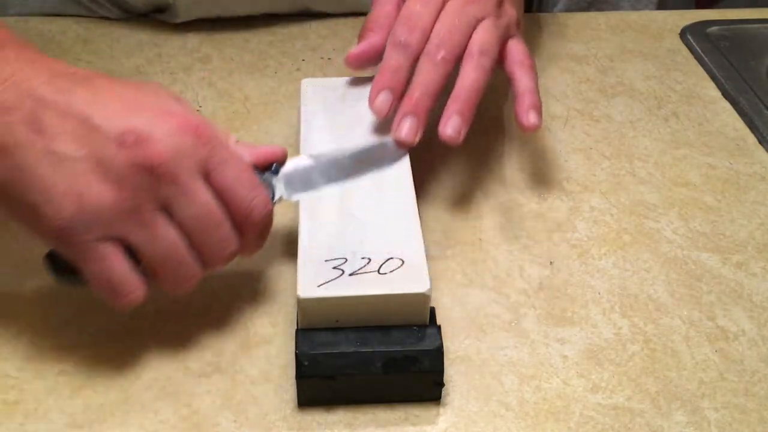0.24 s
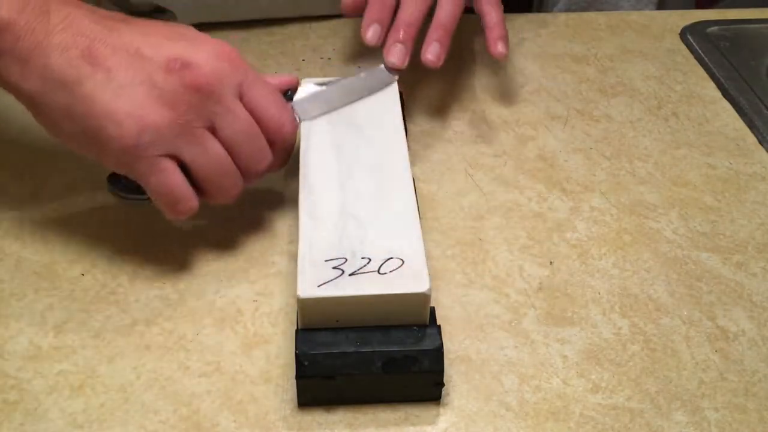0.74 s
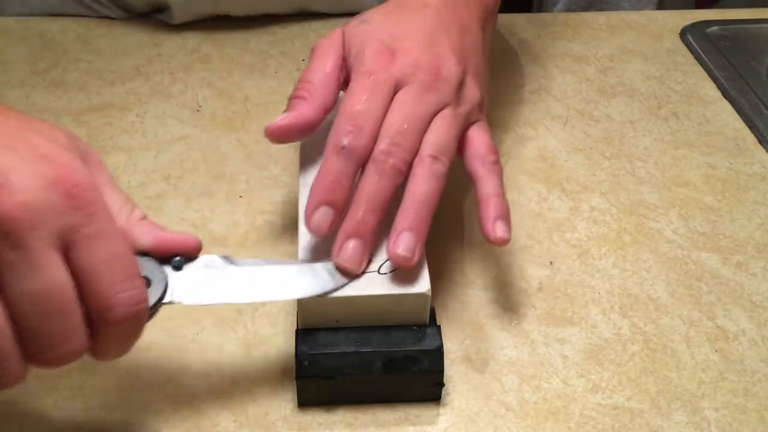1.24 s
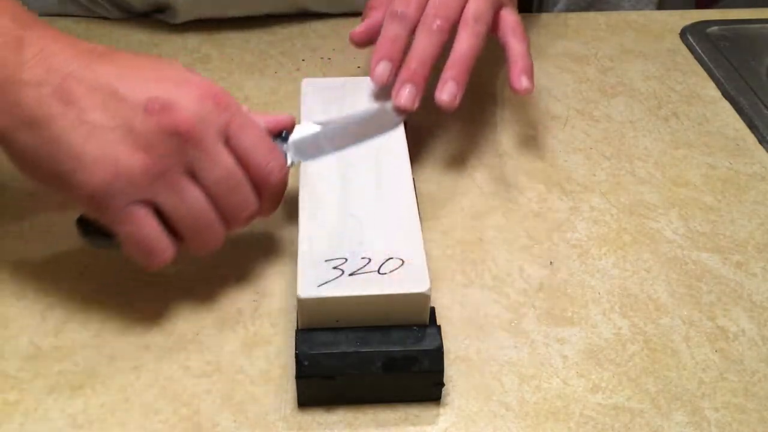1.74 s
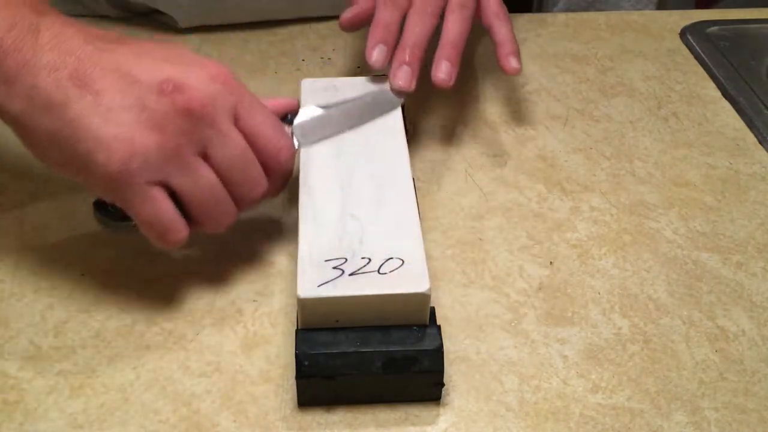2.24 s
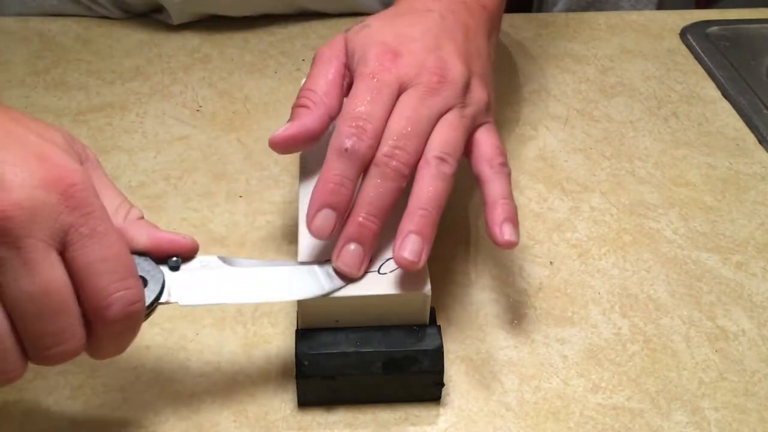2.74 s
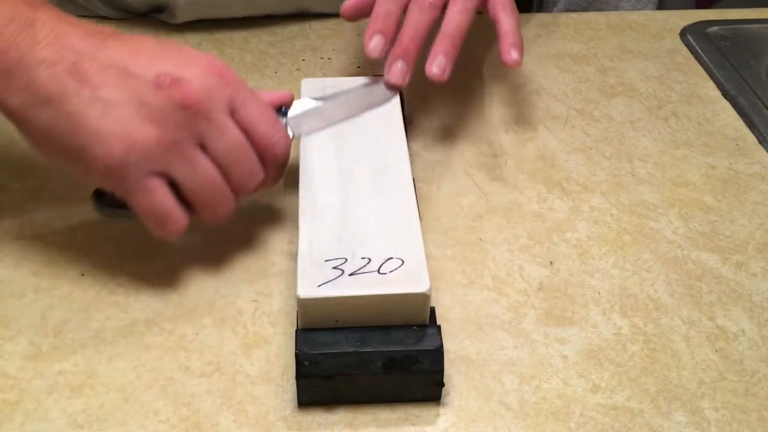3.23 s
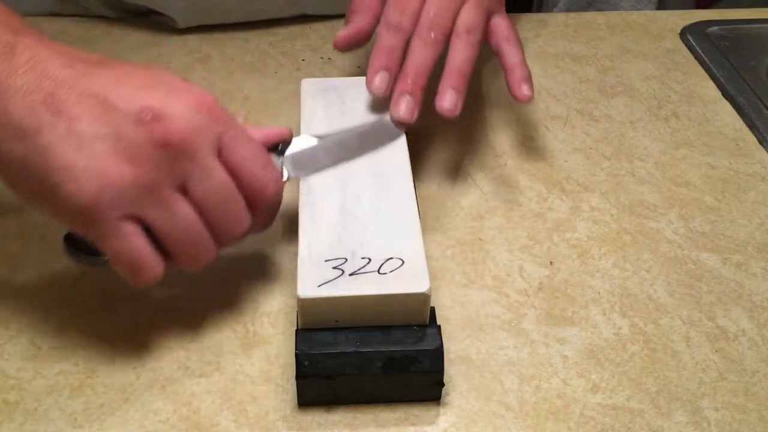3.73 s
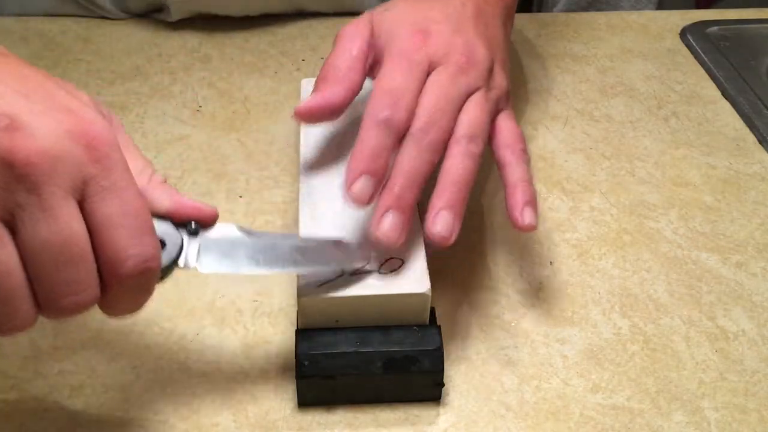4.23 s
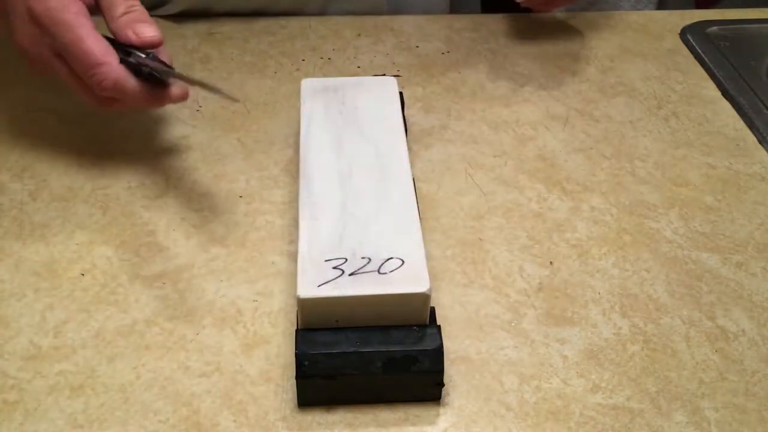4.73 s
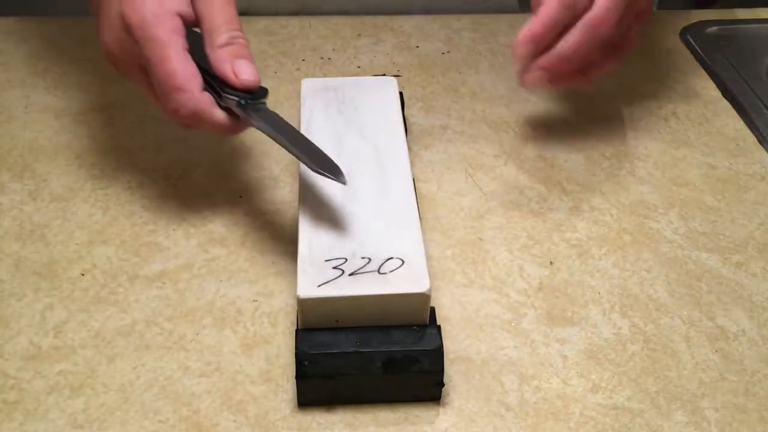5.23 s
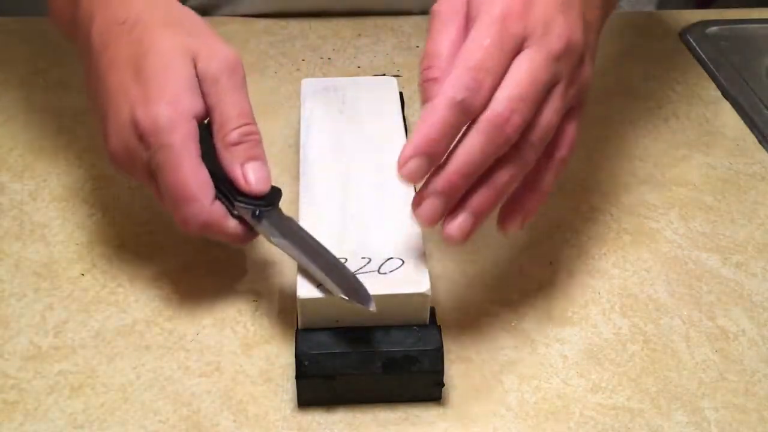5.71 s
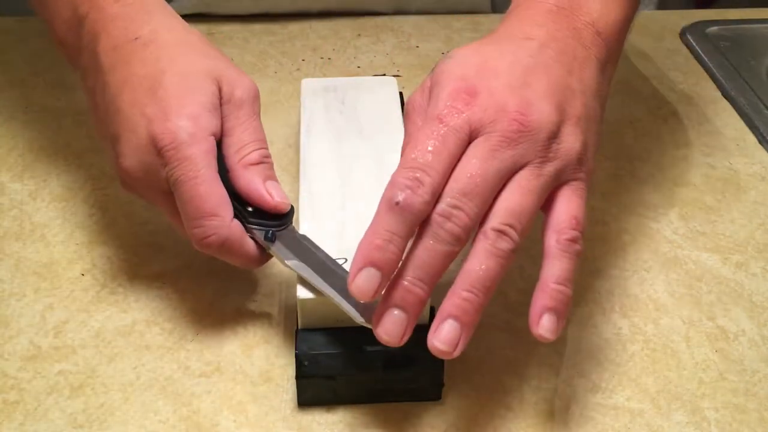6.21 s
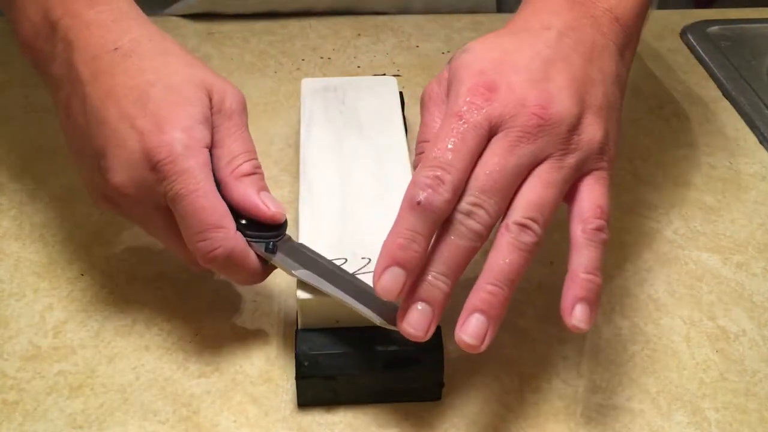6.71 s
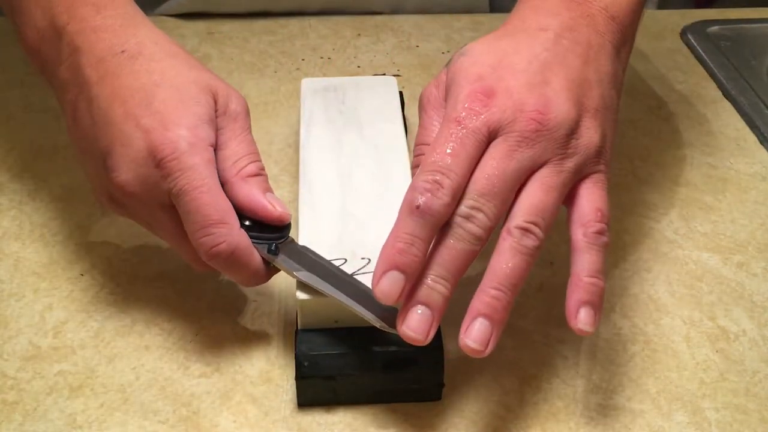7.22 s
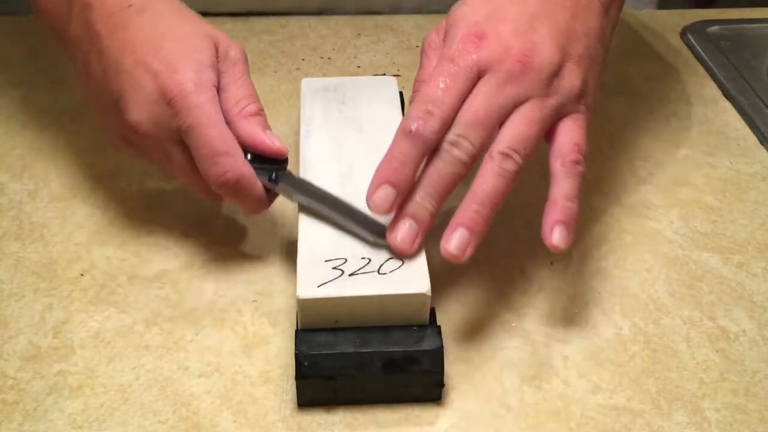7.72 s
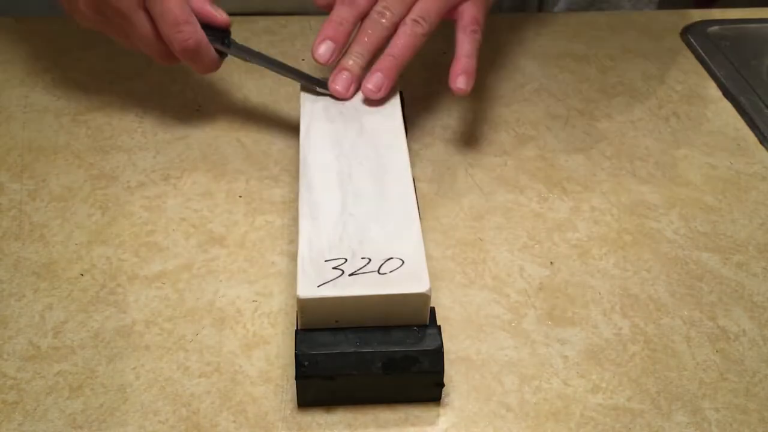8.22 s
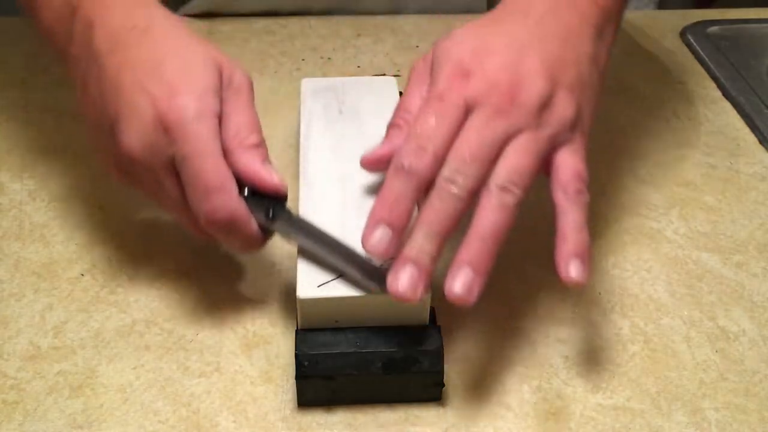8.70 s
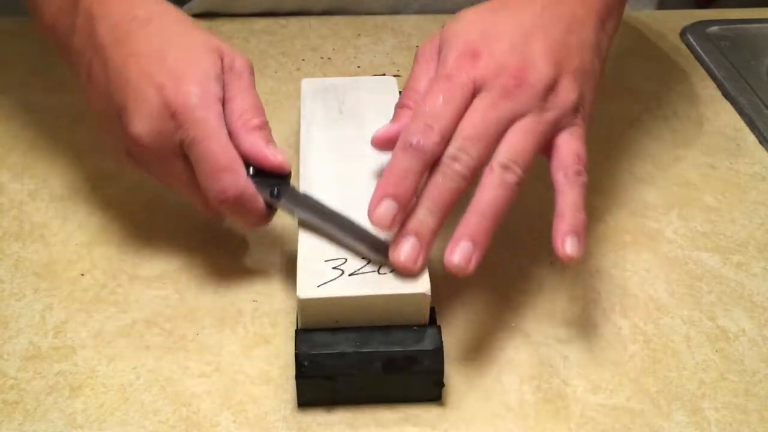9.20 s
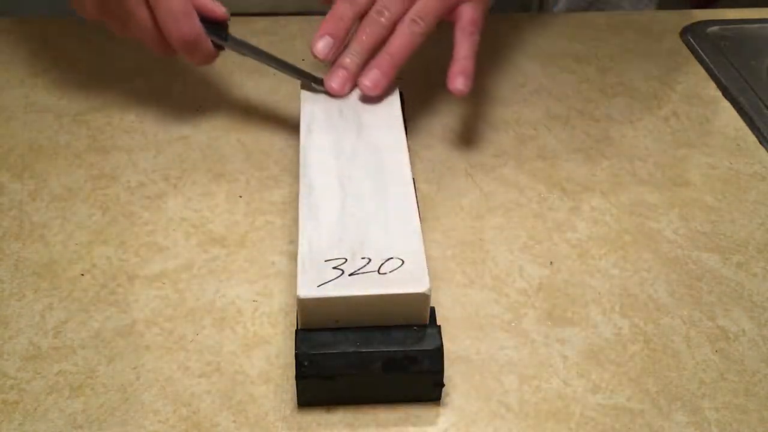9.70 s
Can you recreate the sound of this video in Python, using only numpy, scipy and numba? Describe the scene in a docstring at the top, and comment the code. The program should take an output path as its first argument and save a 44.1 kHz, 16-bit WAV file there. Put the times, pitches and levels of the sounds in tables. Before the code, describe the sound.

Close up in a kitchen, a knife blade strokes a wet sharpening stone in even, hissing, ringing rasps, alternating push and pull. After six strokes it stops; soft grip rustles and tiny scrapes follow as the tip is placed. Then four brisker strokes begin, the last cut short. A low appliance hum and dull counter rumble lie underneath.

```python
"""Knife on a wet whetstone, kitchen counter

Close mono perspective, one microphone position, a short tail from nearby walls: six strokes along a folding
knife's edge, a pause in which the tip is set down and nudged, then four on the tip, the last cut short.
Gritty noise rasps and excites resonances whose pitch and strength follow the contact; catches click on top.
The counter rumbles as filtered noise; behind it lie air noise, faint room tones and an appliance's hum.
"""
import sys
import numpy as np
from scipy import signal
from scipy.fft import rfft, irfft, next_fast_len
from scipy.io import wavfile
from scipy.ndimage import map_coordinates
from numba import njit

SR = 44100
rng = np.random.default_rng(int(sys.argv[2]) if len(sys.argv) > 2 else 0)


def digitize_waveform(pressure):
    """Quantize a signal to 16-bit integers and store it at the path in sys.argv[1].

    Rows of a 2-D input are taken as channels; values are limited to [-1, 1].
    """
    field = np.atleast_2d(pressure).T
    bounded = np.clip(field, -1, 1)
    quanta = np.round(bounded * 32767).astype(np.int16)
    wavfile.write(sys.argv[1], SR, quanta)


N = 438794
TIME = np.arange(N) / SR
CUTOFF_HZ = 15720  # top of the noise spectra and of the whole pickup

# Widths in these tables are for one pass of a resonance; most noise bands take two passes.
# Room air, spectrum shape: (frequency [Hz], relative density [dB per Hz])
AIR_SPECTRUM = [(20, -18), (36, -9), (52, 7.5), (85, -1), (160, -1.5), (190, -8.5), (370, -9.5),
                (500, -20.5), (1100, -24), (1600, -28), (2200, -29.5), (4500, -39), (10000, -44.5),
                (16000, -48.5)]
AIR_DB = -47.5
# Low room resonance and faint whines: (frequency [Hz], width [Hz], level [dB])
ROOM_TONES = [(57.6, 20.5, -54.5), (1209, 43, -77), (1829, 40, -78.5), (1877, 25, -81.5), (2665, 23, -86.5),
              (2755, 41, -83), (3490, 170, -81)]
# Partials of the appliance: (frequency [Hz], pitch wander [Hz], relative level [dB])
HUM_PARTIALS = [(106.9, 2.51, 1.5), (214.1, 2.98, -17.5), (256.3, 5.4, -17.5), (297, 7, -13.5),
                (357.5, 9, -19)]
# Chance unevenness of the hum's level, before the trim: (time [s], level [dB])
HUM_UNEVENNESS = [(0.0, -50.5), (0.83, -46.5), (0.99, -50.5), (1.13, -48), (3.85, -49), (5.76, -51),
                  (5.85, -63), (6.1, -44), (6.43, -52), (6.79, -43), (7.06, -53), (7.34, -46.5),
                  (8.09, -50.5), (8.76, -45), (9.7, -50), (9.95, -50.5)]
HUM_TRIM_DB = -1.4

# Counter under the stone: (frequency [Hz], width [Hz], relative level [dB])
COUNTER_MODES = [(70, 47, -1), (125, 36, 3), (154, 28, -0.5)]
# The hands resting on the counter, and a trim over resting and stroking rumble alike
RESTING_RUMBLE_DB, RUMBLE_TRIM_DB = -56, -1.5

# Soft rustles as the grip changes: (start [s], length [s], level [dB], centre [Hz], width [Hz])
RUSTLES = [(4.5, 0.25, -73, 1200, 900), (4.618, 0.033, -61, 1500, 500), (4.803, 0.14, -70.5, 1090, 600),
           (5.0, .08, -74, 2100, 800)]
# Wet film squeaking under the resting tip: (start [s], length [s], level [dB], pitch [Hz], rise [Hz/s])
SQUEAK = (7.11, .13, -81, 9780, 3300)

# Coarsest grains catching, steel tapping stone: (time [s], peak before trim [dB], band centre [Hz])
CATCHES = [(0.439, -38, 8650), (0.4774, -40, 3700), (0.9132, -35, 3910), (1.0998, -34, 6430),
           (1.2033, -36.5, 6000), (1.6964, -38, 3840), (1.7786, -37, 3810), (1.9511, -34, 3760),
           (5.8148, -41, 3540), (6.438, -38.5, 9000), (6.6258, -48, 3860), (6.7153, -42.5, 4100),
           (7.065, -49, 9040), (7.0967, -51, 3990), (7.4755, -47.5, 3560), (7.777, -40, 4030),
           (7.857, -37, 6400), (7.934, -31.5, 6020), (8.6218, -37, 8750), (8.6502, -36, 4720),
           (9.3312, -31, 7390), (9.397, -33, 8090), (9.4141, -32, 6830), (9.4332, -31, 6020)]
CATCH_TRIM_DB = -1.5
CRACK_HZ, CRACK_WIDTH_HZ = 7960, 4900  # the broad crack of a catching grain

# Light rubs while the knife is turned over and its tip placed:
# (start [s], length [s], rasp at the middle [dB], swell over the rub [dB], relative ring [dB])
RUBS = [(5.037, .03, -66, 0, -8), (5.293, 0.057, -66.5, -5, -8), (5.816, 0.222, -66.5, -4, -1),
        (6.042, 0.1, -63.5, -3, -1), (6.23, .13, -73, 9, 0), (6.364, 0.14, -62.5, -1, 4),
        (6.682, 0.042, -62.5, -2, -1), (6.87, .025, -70, 0, -1), (6.954, .15, -78, 4, -3)]
RUB_EDGE_S = 0.0069
# Strokes along the edge, push and pull in turn: (start [s], length [s], rasp at mid-stroke [dB],
# rise [s], sag over the stroke [dB], relative ring [dB], rumble before trim [dB])
EDGE_STROKES = [(0.0, 0.68, -56, 0.12, -4, -3, -49), (.71, .72, -55.5, 0.16, 0.5, 0, -49.5),
                (1.43, .7, -57.5, 0.15, 3, 1, -49.5), (2.13, 0.68, -55.5, 0.23, 4.5, 1.5, -46),
                (2.82, .7, -57.5, 0.14, 5.5, -1, -45.5), (3.52, 0.75, -56, .2, 3.5, -1, -43)]
# Strokes on the tip, same columns
TIP_STROKES = [(7.51, .78, -56, 0.074, 4, 2.5, -46.5), (8.29, .735, -59.5, .08, 4.5, 1, -48),
               (9.025, .725, -55.5, 0.11, -6.5, -2.5, -45.5), (9.75, 0.8, -52.5, 0.068, -12.5, -1, -46)]
# Leaving and reaching a turn: (rise exponent [1], braking time [s], fall exponent [1])
EDGE_TURN = (1.18, 0.13, 0.95)
TIP_TURN = (.95, .1, 0.81)

UNSTEADY_DB, UNSTEADY_HZ = 0.88, 21  # the hand's pressure wavers
# Steel biting deeper (+) or riding light (-): (start [s], length [s], change [dB])
BITES = [(0.376, 0.039, -7), (0.42, .06, 0), (0.498, 0.072, -8), (1.708, 0.044, -4.5), (1.765, 0.029, 2),
         (1.814, 0.023, -4), (2.294, 0.037, 2), (3.135, 0.024, -6.5), (8.544, 0.11, 6), (8.89, 0.081, 4),
         (9.326, 0.13, 3)]
BITE_EDGE_S = 0.005

# Broad colour of steel on grit: (frequency [Hz], relative density [dB per Hz])
EDGE_COLOUR = [(700, -14), (2000, -12.5), (2800, -8.5), (3600, -4), (4300, -3), (4850, -6), (5800, 3.5),
               (7500, 0.5), (9400, 1), (10400, -4.5), (11200, 1), (13000, -2), (15800, -3)]
TIP_COLOUR = [(700, -6), (2000, -5.5), (2900, -5), (3900, -0.5), (5100, -7.5), (6200, 2.5), (7800, 1),
              (9400, 3), (10400, -7), (11600, -0.5), (13000, 1), (15800, -2)]
# Share by which the weak modes rise from the near end to the far end; negative falls
EDGE_HISS_BEND, TIP_HISS_BEND = -0.05, 0.09
# Blade modes on the edge, strongest at a spot in the cycle (push 0-1, pull 1-2): (frequency [Hz],
# width [Hz], relative level [dB], spot [strokes], reach [strokes], glide [Hz/stroke])
EDGE_MODES = [(3830, 350, 0.5, 0.59, 0.18, -600), (3860, 450, -2.5, 1.225, 0.093, 0),
              (4350, 550, -5, 1.464, .13, 0), (6020, 540, 6, 0.33, 0.058, 4000),
              (5530, 300, -6.5, 0.59, 0.26, -200), (6200, 1400, -3.5, 1.46, 0.11, 500),
              (6900, 370, -7, 1.68, 0.17, 2000), (6700, 480, -3, 0.075, .1, 1500),
              (8770, 400, -4, 0.27, .12, 4200), (8500, 620, -7, 0.32, 0.68, 2),
              (9030, 480, -7, 1.12, 0.24, 0), (9600, 670, -6.5, 1.63, 0.041, -2000),
              (11760, 1500, -4.5, 0.14, 0.071, 6009), (11660, 780, -12.5, 1.95, 0.069, 0)]
# Blade modes on the tip, same columns
TIP_MODES = [(3970, 360, -2.5, 0.26, 0.36, 200), (4460, 250, -12, 0.71, 0.12, 2500),
             (4560, 360, -8.5, 1.2, 0.23, -1400), (7000, 420, -4, 0.23, 0.12, 1196),
             (6230, 600, -1, 0.52, .1, -800), (6400, 505, -6, 0.83, 0.092, -500),
             (6400, 690, 2.5, 1.277, 0.065, -600), (7200, 500, -5.5, 1.75, 0.13, 0),
             (8750, 610, -1.5, 0.35, 0.14, 296), (9320, 860, 4, 0.75, 0.037, 0),
             (8960, 560, -2, 1.11, 0.19, 600), (8510, 550, -3, 1.8, 0.16, -400),
             (13000, 600, -10, 0.74, .12, 0), (13400, 500, -6, 1.16, 0.082, 4000)]
# A heavier touch brings out low modes: dB of ring per dB of rasp above firm, for a mode at this pitch
HEAVY_RING, FIRM_DB, LOW_MODE_HZ = 0.56, -56, 4000


def from_db(db):
    """Decibels to gain."""
    return 10 ** (np.asarray(db) / 20)


def rms_one(x):
    """Scale to an rms of 1."""
    return x / np.sqrt(np.mean(x ** 2) + 1e-20)


def level(rows):
    """Gain of a (time, dB) curve."""
    return from_db(np.interp(TIME, *np.transpose(rows)))


def held(start, length, edge_s):
    """1 while something lasts, with soft edges."""
    inside_s = np.minimum(TIME - start, start + length - TIME)
    return np.clip(0.5 + inside_s / (2 * edge_s), 0, 1)


def drift(rate_hz, size=N):
    """Smooth chance with spread 1 that changes about rate_hz times a second."""
    hop = 40  # computed at every 40th sample, then joined by straight lines
    settle = 2000
    r = np.exp(-2 * np.pi * rate_hz * hop / SR)
    steps = rng.standard_normal(size // hop + settle + 2)
    slow = signal.lfilter([1], [1, -2 * r, r * r], steps)[settle:]
    return np.interp(np.arange(size) / hop, np.arange(len(slow)), rms_one(slow))


def fading(clicks, fade_s):
    """Each click jumps up and dies away exponentially."""
    return signal.lfilter([1], [1, -np.exp(-1 / (fade_s * SR))], clicks + 1e-18)


def coloured(x, spectrum):
    """Filter by a (Hz, dB) spectrum; white noise keeps its power."""
    hz, db = np.transpose(spectrum)
    size = next_fast_len(N + SR // 10)
    bins = np.maximum(np.fft.rfftfreq(size, 1 / SR), 1)
    gain = from_db(np.interp(np.log(bins), np.log(hz), db)) * (bins < CUTOFF_HZ)
    return irfft(rfft(x, size) * rms_one(gain), size)[:N]


def resonance(x, hz, width_hz):
    """One pass through a fixed resonance with a peak gain of 1."""
    b, a = signal.iirpeak(hz, hz / width_hz, fs=SR)
    return signal.lfilter(b, a, x)


def narrow_noise(hz, width_hz):
    """Noise twice through one resonance: a wavering tone of rms 1."""
    noise = rng.standard_normal(N + SR)
    ringing = resonance(resonance(noise, hz, width_hz), hz, width_hz)
    return rms_one(ringing[SR:])  # the first second lets the filter settle


@njit
def resonate(x, turn, r):
    """A ringing mode whose angle per sample may change; white noise keeps its power."""
    out, state = np.zeros(len(x)), 0j
    for i in range(len(x)):
        state = state * r * complex(np.cos(turn[i]), np.sin(turn[i])) + x[i] + 1e-18
        out[i] = state.real
    return out * np.sqrt(2 * (1 - r * r))


def gliding_noise(hz, width_hz):
    """Noise twice through one ringing mode whose pitch follows the hz curve."""
    turn = 2 * np.pi * hz / SR
    r = np.exp(-np.pi * width_hz / SR)
    noise = rng.standard_normal(len(hz))
    return resonate(resonate(noise, turn, r), turn, r)


def room_air():
    """Steady air noise, coloured white noise."""
    return from_db(AIR_DB) * coloured(rng.standard_normal(N), AIR_SPECTRUM)


def room_tones():
    """Room resonances and whines as narrow bands of noise."""
    return sum(from_db(db) * narrow_noise(hz, width) for hz, width, db in ROOM_TONES)


def wavering_tone(hz, wander_hz, waver):
    """A tone of rms 1 that wanders in pitch and strength."""
    phase = 2 * np.pi * np.cumsum(hz + wander_hz * drift(5.99)) / SR
    return rms_one(np.sin(phase) * (1 + waver * drift(7.7)))


def appliance_hum():
    """A few partials that waver separately, under one shared, randomly uneven level."""
    hum = sum(from_db(db) * wavering_tone(hz, wander, waver=0.24) for hz, wander, db in HUM_PARTIALS)
    return from_db(HUM_TRIM_DB) * level(HUM_UNEVENNESS) * hum


def kitchen(x, t60, wet_db):
    """A short diffuse tail from the nearby walls: decaying noise that starts after 4 ms."""
    t = np.arange(SR // 2) / SR
    tail = rng.standard_normal(len(t)) * from_db(-60 * t / t60) * (t > 0.004)
    reflected = signal.fftconvolve(x, tail / np.linalg.norm(tail))[:N]
    return x + from_db(wet_db) * reflected


def counter(shaking):
    """The counter and the stone's holder rumble in a few broad modes, more while the blade slides."""
    rumble = sum(from_db(db) * narrow_noise(hz, width) for hz, width, db in COUNTER_MODES)
    strength = np.hypot(shaking, from_db(RESTING_RUMBLE_DB))
    return from_db(RUMBLE_TRIM_DB) * strength * rms_one(rumble)


def grip():
    """The handle rustles softly as it turns in the hand: short bands of unsteady noise."""
    rustle = np.zeros(N)
    for start, length, db, hz, width_hz in RUSTLES:
        rustle += held(start, length, edge_s=0.013) * from_db(db) * narrow_noise(hz, width_hz)
    return rustle * from_db(2 * drift(14))


def squeak(width_hz):
    """A thin rising whistle of water squeezed from under the steel: gliding narrow noise."""
    start, length, db, hz, rise_hz = SQUEAK
    pitch_hz = hz + rise_hz * np.clip(TIME - start, 0, length)
    whistle = rms_one(gliding_noise(pitch_hz, width_hz))
    return held(start, length, edge_s=0.02) * from_db(db) * whistle


def catches(fade_s, width_hz, crack_db):
    """Each catch is a burst of a few milliseconds: a broad crack and a band at its own pitch."""
    out, t = np.zeros(N + SR), np.arange(SR // 20) / SR
    for start, db, hz in CATCHES:
        burst = rng.standard_normal(len(t)) * np.exp(-t / fade_s)
        band = resonance(burst, hz, width_hz)
        crack = resonance(burst, CRACK_HZ, CRACK_WIDTH_HZ)
        tick = band + from_db(crack_db) * crack
        at = int(start * SR)
        out[at:at + len(t)] += from_db(db + CATCH_TRIM_DB) * tick / abs(tick).max()
    return out[:N]


def rubs():
    """The light rubs in the pause: gives rasp gain and ring dB."""
    rasp, ring = np.zeros((2, N))
    for start, length, db, swell_db, ring_db in RUBS:
        touch = held(start, length, RUB_EDGE_S)
        from_middle = np.clip((TIME - start) / length - 0.5, -0.5, 0.5)
        rasp += touch * from_db(db + swell_db * from_middle)
        ring += touch * ring_db
    return rasp, ring


def stroking(strokes, turn):
    """Strokes gather speed and brake: gives rasp gain, ring dB, rumble gain and travel in strokes."""
    rasp, ring, rumble, travel = np.zeros((4, N))
    rise_power, braking_s, fall_power = turn
    for start, length, db, rise_s, sag_db, ring_db, rumble_db in strokes:
        now = (TIME >= start) & (TIME < start + length)
        t = TIME[now] - start
        gathering = np.clip(t / rise_s, 0, 1) ** rise_power
        braking = np.clip((length - t) / braking_s, 0, 1) ** fall_power
        speed = gathering * braking
        rasp[now] = speed * from_db(db - sag_db * (t / length - 0.5))
        ring[now] = ring_db
        rumble[now] = speed * from_db(rumble_db)
        travel += np.clip((TIME - start) / length, 0, 1)
    return rasp, ring, rumble, travel


def pressure():
    """The hand's pressure wavers; now and then the steel bites or rides light."""
    bites_db = sum(db * held(start, length, BITE_EDGE_S) for start, length, db in BITES)
    return from_db(UNSTEADY_DB * drift(UNSTEADY_HZ) + bites_db)


def grit(coarse_per_s, coarse_db, crush_s):
    """Friction strength: a steady floor of fine grains and short bursts as coarser grains are crushed."""
    sizes = from_db(coarse_db + 2.8 * np.minimum(rng.exponential(1, N), 4))
    struck = rng.random(N) < coarse_per_s / SR
    crushed = fading(struck * sizes ** 2, crush_s)  # powers add
    return rms_one(np.sqrt(1 + crushed))


def weak_modes(pitch, patchy_db, shift_hz, count=54):
    """A hiss of many noise bands that swell and sink separately and glide together with pitch."""
    size = next_fast_len(N, real=True)
    white = rfft(rng.standard_normal(size)).astype(np.complex64)
    bins = np.fft.rfftfreq(size, 1 / SR)
    centres, step = np.linspace(0, 0.4 * SR, count, retstep=True)
    hiss = np.zeros(N)
    for hz in centres:
        band = irfft(white * (abs(bins - hz) < step / 2), size)[:N]
        hiss += band * from_db(patchy_db * np.tanh(drift(shift_hz)))
    # reading the hiss faster or slower raises or lowers every band
    return rms_one(map_coordinates(hiss, [np.cumsum(pitch)], order=3, mode="wrap"))


def tracks(modes, travel, force):
    """Every push and pull passes spots where a mode swells and glides: gives (Hz, dB, width Hz)."""
    heavy_db = HEAVY_RING * np.clip(20 * np.log10(force + 1e-9) - FIRM_DB, -20, 2)
    for hz, width_hz, db, spot, reach, glide_hz in modes:
        past = (travel - spot + 1) % 2 - 1  # strokes past the spot, in a cycle of two
        away_db = 10 * np.log10(1 + (past / reach) ** 4)
        pitch_hz = hz + glide_hz * np.clip(past, -2 * reach, 2 * reach)
        yield pitch_hz, db - away_db + heavy_db * (LOW_MODE_HZ / hz) ** 2, width_hz


def blade(friction, hiss, modes, ring_db, broad_db, chatter_db, jitter):
    """Friction radiates as a broad hiss and through modes retuned as the contact moves along the steel."""
    out, size = from_db(broad_db) * hiss, len(hiss)
    for hz, db, width_hz in modes:
        # each mode has its own noise; unsteady contact makes its pitch and strength jump about
        ring = gliding_noise(hz * (1 + jitter * drift(32, size)), width_hz)
        chatter = from_db(chatter_db * np.tanh(drift(16, size)))
        out = out + from_db(db + ring_db) * rms_one(ring * chatter)
    return out * friction


def scene():
    """Edge strokes, the pause and tip strokes over the room's hum."""
    background = room_air() + room_tones() + appliance_hum()
    edge_rasp, edge_ring, edge_rumble, edge_travel = stroking(EDGE_STROKES, EDGE_TURN)
    tip_rasp, tip_ring, tip_rumble, tip_travel = stroking(TIP_STROKES, TIP_TURN)
    rub_rasp, rub_ring = rubs()

    force = pressure() * (edge_rasp + rub_rasp + tip_rasp)
    friction = force * grit(coarse_per_s=140, coarse_db=-2.0, crush_s=0.0019)
    edge = np.arange(N) < N // 2  # the knife is turned over halfway through
    tip = ~edge
    far = np.sin(np.pi * (edge_travel + tip_travel) / 2) ** 2  # place on the stone: near 0, far 1
    bend = np.where(edge, EDGE_HISS_BEND, TIP_HISS_BEND)
    hiss = weak_modes(1 + bend * (far - 0.5), patchy_db=7.5, shift_hz=10.3)

    edge_steel = blade(
        friction[edge], coloured(hiss, EDGE_COLOUR)[edge],
        tracks(EDGE_MODES, edge_travel[edge], force[edge]),
        edge_ring[edge] - 1.5, broad_db=-2.5, chatter_db=4.5, jitter=0.012)
    tip_steel = blade(
        friction[tip], coloured(hiss, TIP_COLOUR)[tip],
        tracks(TIP_MODES, tip_travel[tip], force[tip]),
        (tip_ring + rub_ring)[tip] - 2.5, broad_db=-2.0, chatter_db=4.5, jitter=0.013)
    steel = np.concatenate([edge_steel, tip_steel])
    steel += catches(fade_s=0.0018, width_hz=720, crack_db=-6.5)
    steel += squeak(width_hz=200)

    close = kitchen(steel, t60=0.094, wet_db=-8.5)
    mix = background + counter(edge_rumble + tip_rumble) + grip() + close
    return mix[None]  # one channel


def record(dry):
    """The microphone chain cuts the deepest bass gently and the top steeply."""
    bass_cut = signal.butter(2, 19, "high", fs=SR, output="sos")
    top_cut = signal.ellip(16, 0.1, 70, CUTOFF_HZ, fs=SR, output="sos")
    return signal.sosfilt(top_cut, signal.sosfilt(bass_cut, dry))


dry = scene()
out = record(dry)
digitize_waveform(out)
```